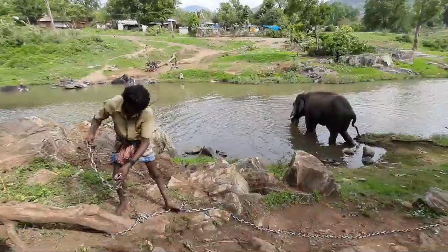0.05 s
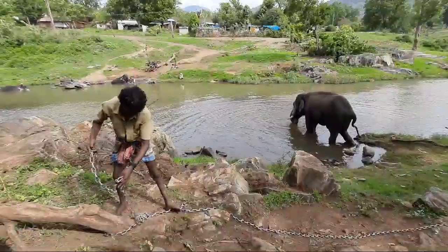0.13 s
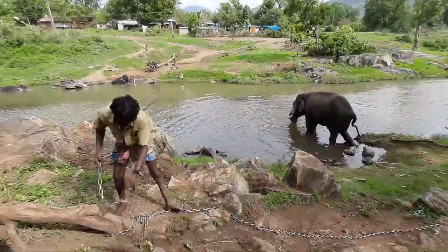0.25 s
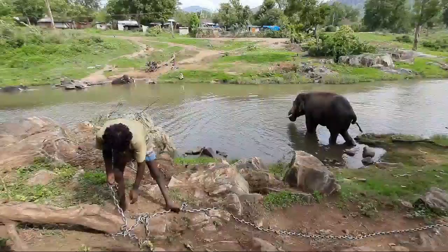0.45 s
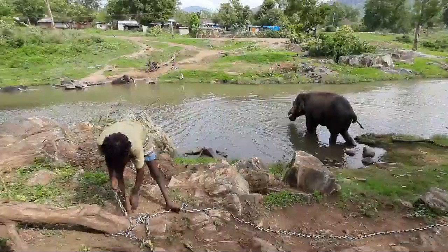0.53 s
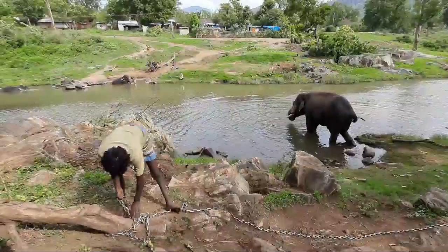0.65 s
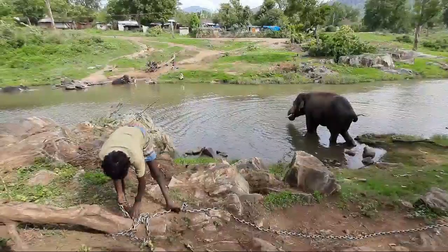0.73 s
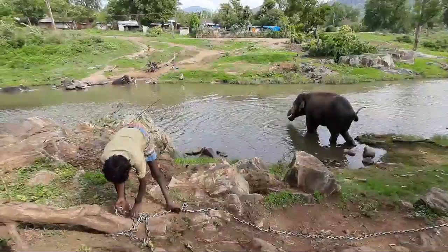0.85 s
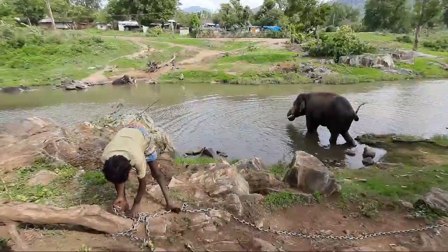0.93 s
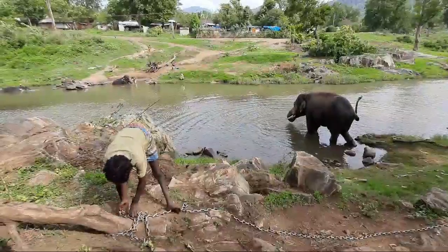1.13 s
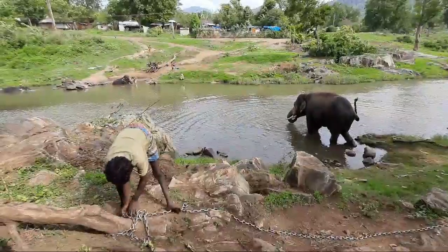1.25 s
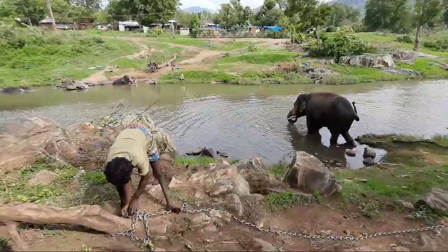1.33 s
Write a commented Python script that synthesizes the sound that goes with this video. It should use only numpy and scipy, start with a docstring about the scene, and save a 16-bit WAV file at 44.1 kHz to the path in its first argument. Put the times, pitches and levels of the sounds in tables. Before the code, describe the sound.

A steel chain clinks a few times slightly to the left, while wind puffs on the microphone over a faint outdoor hiss. From about 0.3 to 0.7 seconds the chain pours into a bright, ringing heap, knocking on rock and crunching grit around 0.4 seconds. A link rings faintly near 0.8 to 1 second, then the loose end ticks and rattles softly until 1.4 seconds as the wind fades.

```python
"""Wind puffs on the microphone ports over a faint background hiss, on a rocky river bank.
A little to the left a steel chain is lowered: a few links clink, each ringing at its own pitch,
then the slack pours into a ringing heap, crunching grit and knocking on the stone.
A free-hanging link rings faintly, and the loose end ticks and rattles as it is picked over."""
import sys
import numpy as np
from scipy.fft import rfft, irfft, next_fast_len
from scipy.io import wavfile
from scipy.ndimage import uniform_filter1d, minimum_filter1d, map_coordinates

SR = 44100
rng = np.random.default_rng(int(sys.argv[2]) if len(sys.argv) > 2 else 0)


def dump(signal):
    """Clip the signal to [-1, 1] and save it as 16-bit WAV at the path in sys.argv[1]."""
    limited = np.clip(np.atleast_2d(signal).T, -1, 1)
    pcm = np.round(limited * 32767).astype(np.int16)
    wavfile.write(sys.argv[1], SR, pcm)


N = 61739

# Spectrum of steel landing on gritty rock: frequency_hz, level_db
ROCK_SPECTRUM = [(200, 2.5), (1500, 2), (2100, 3.5), (3500, -7.5), (5400, -0.5), (7000, -19), (15000, -3.5)]
WIND_ALIKE, AIR_ALIKE, ROCK_ALIKE = 0.13, 0.022, -0.037  # left-right correlation
ATTACK_S = 0.001
LEFT_RIGHT = np.array([[.5], [-.5]])  # splits a level or phase gap between the channels


def amp(db):
    """Decibels to gain."""
    return 10 ** (np.asarray(db) / 20)


def unit(x):
    """Scale to rms 1."""
    return x / np.sqrt(np.mean(x ** 2) + 1e-20)


def clock():
    """Time of each sample in seconds."""
    return np.arange(N) / SR


def level(rows, t):
    """Gain along a curve of time_s, level_db."""
    return amp(np.interp(t, *np.transpose(rows)))


def wobble(knots_per_s):
    """A smooth random curve."""
    knots = rng.standard_normal(int(N * knots_per_s / SR) + 4)
    return map_coordinates(knots, [clock() * knots_per_s])


def noise(spectrum, alike, scale=1):
    """Stereo noise of rms 1 with the given spectrum and left-right correlation."""
    size = next_fast_len(N + SR // 4)
    hz, db = np.transpose(spectrum)
    gain = amp(np.interp(np.log(np.fft.rfftfreq(size, 1 / SR) + 1), np.log(hz * scale), db))
    mid, side = irfft(rfft(rng.standard_normal((2, size))) * gain, size)[:, :N]
    angle = np.arccos(np.clip(alike, -1, 1)) / 2
    mid, side = np.cos(angle) * mid, np.sin(angle) * side
    return unit(np.array([mid + side, mid - side]))


def add(out, start_s, x):
    """Mix x into out from start_s."""
    i = max(round(start_s * SR), 0)
    out[:, i:i + x.shape[1]] += x[:, :max(N - i, 0)]


def wind(lumps_db=4.5, lumps_per_s=130):
    """Hollow, lumpy puffs blow right across the microphone ports, over a low rumble."""
    # Puffs at the ports: peak_s, level_db, width_s, centre_hz
    puffs = [(0.02, -27.5, 0.043, 350), (0.055, -25, 0.0092, 93), (0.113, -27.5, 0.005, 410),
             (.195, -34, 0.024, 88), (0.219, -25, 0.0048, 273), (0.254, -20, 0.014, 335),
             (0.339, -28, 0.012, 412), (0.481, -30, .012, 295), (0.587, -34, .012, 253),
             (.77, -32, 0.012, 327), (0.85, -31, 0.021, 331), (0.906, -33, 0.015, 355),
             (0.978, -34.5, 0.0083, 337), (1.071, -40.5, 0.0043, 290), (1.172, -36, 0.013, 237)]
    # Spectrum of a puff: ratio_to_centre, level_db
    puff_spectrum = [(.2, -31), (.55, -12.5), (1, 0.5), (1.6, -7.5), (2.4, -24.5), (20, -100)]
    # Rise and fall of the rumble: time_s, level_db
    rumble_level = [(0, -26.5), (.09, -35.5), (.2, -36), (.41, -37.5), (.455, -72), (.59, -39.5),
                    (.71, -51.5), (.78, -43.5), (1.19, -52.5), (1.4, -60.5)]
    # Spectrum of the rumble: frequency_hz, level_db
    rumble_spectrum = [(20, -29), (70, -3), (220, -10), (500, -15.5), (1000, -32.5), (8000, -110)]
    t = clock()
    out = level(rumble_level, t) * noise(rumble_spectrum, WIND_ALIKE)
    for peak_s, db, width_s, hz in puffs:
        swell = np.exp(1 - np.sqrt(1 + 2 * ((t - peak_s) / width_s) ** 2))
        eddies = swell * amp(lumps_db * wobble(lumps_per_s)) * noise(puff_spectrum, WIND_ALIKE, hz)
        out += amp(db) * unit(eddies) * np.sqrt(np.mean(swell ** 2))
    return out


def background_hiss():
    """Faint background hiss that swells while the chain pours, then falls back."""
    # Spectrum of the hiss: frequency_hz, level_db
    spectrum = [(300, -2.5), (1300, -12.5), (2000, -9.5), (2600, -16), (7000, -20.5), (11500, -19.5),
                (15000, -36)]
    # Level of the hiss: time_s, level_db
    hiss_level = [(0, -51.5), (.24, -45.5), (.5, -43), (.65, -55.5), (1.4, -56.5)]
    return level(hiss_level, clock()) * noise(spectrum, AIR_ALIKE)


def ring(hz, t60, phase_spread_rad=0.77):
    """One dying mode of a steel link or a stone, which reaches the two ports out of phase."""
    # Phase lead of the left port: frequency_hz, lead_rad
    port_phase = [(10200, 1.33), (12000, 2.04)]
    t = clock()[:int(min(t60, 1) * SR)]
    lead = np.interp(hz, *np.transpose(port_phase)) + phase_spread_rad * rng.standard_normal()
    envelope = amp(-60 * t / t60) * (1 - np.exp(-t / ATTACK_S))
    return envelope * np.sin(2 * np.pi * (hz * t + rng.random()) + lead * LEFT_RIGHT)


def ticks(hits, hz, t60=0.025):
    """The short crack of steel on steel at each hit (start_s, level_db), brightest near hz."""
    # Spectrum of a contact: ratio_to_link_pitch, level_db
    spectrum = [(.1, -31), (.68, -21), (1.02, 0), (1.17, -12), (1.4, -38)]
    power, t = np.zeros((1, N)), clock()[:SR // 10]
    for start_s, db in hits:
        envelope = amp(db - 60 * t / t60) * (1 - np.exp(-t / ATTACK_S))
        add(power, start_s, envelope[None] ** 2)
    return np.sqrt(power) * noise(spectrum, AIR_ALIKE, hz)


def clinks(contacts=3, neighbours=4):
    """Two links ring at their own pitches, stir neighbours of like pitch and rebound ever more softly."""
    # Two links meet: start_s, level_db, first_link_hz, second_link_hz, t60_s, tick_offset_db
    meetings = [(0.0757, -20.5, 12010, 9680, 0.054, -8), (0.1329, -41.5, 10200, 11050, 0.11, 10.5),
                (0.1872, -31.5, 10730, 10200, 0.2, -4), (.2115, -12.5, 11120, 10122, 0.079, -12.5),
                (0.223, -12, 10780, 12100, 0.044, -10.5), (0.2315, -16.5, 11137, 10760, 0.019, -5),
                (0.2737, -32, 10160, 10730, 0.071, 2), (0.305, -32, 10900, 10250, .05, 6.5),
                (0.3181, -13.5, 10840, 11900, 0.15, -4), (0.3419, -2, 10020, 10470, 0.082, -15),
                (0.381, -8.5, 9900, 11840, 0.27, -29), (0.4204, -8, 9880, 10920, 0.077, -11),
                (0.486, -14.5, 11030, 9620, 0.34, -4.5), (0.5559, -18, 9938, 12050, 0.1, -30),
                (0.668, -30.5, 10338, 10010, 0.26, -7), (0.8184, -41.5, 10100, 9500, 0.18, -9),
                (.903, -44, 10650, 11130, 0.26, 4), (0.998, -33, 9502, 10070, 0.21, 2.5),
                (1.1175, -36.5, 10950, 10100, 0.018, -7.5), (1.1717, -42.5, 11250, 12080, 0.17, -4),
                (1.2422, -38, 11450, 11850, 0.061, 5), (1.3, -29.5, 8910, 12140, 0.11, 1)]
    rebound_s, rebound_db, rebound_detune_hz = 0.0076, -8, 61.7
    second_link_db, neighbour_db, neighbour_spread_hz = -6, -15.5, 630
    out = np.zeros((2, N))
    for start_s, db, first_hz, second_hz, t60, tick_db in meetings:
        hits = []
        for bounce in range(contacts):
            hit_s = start_s + rebound_s * bounce * (1 + (rng.random() - .5) / contacts)
            hit_db = db + rebound_db * bounce
            hits.append((hit_s, hit_db + tick_db))
            for hz, link_db in [(first_hz, 0), (second_hz, second_link_db)]:
                detune_hz = bounce * rebound_detune_hz * rng.standard_normal()
                add(out, hit_s, amp(hit_db + link_db) * ring(hz + detune_hz, t60))
            # no two neighbouring links are quite the same size
            between_hz = first_hz + (second_hz - first_hz) * rng.random(neighbours)
            for hz in between_hz + neighbour_spread_hz * rng.standard_normal(neighbours):
                add(out, hit_s, amp(hit_db + neighbour_db) * ring(hz, t60))
        out += ticks(hits, max(first_hz, second_hz))
    return out


def jingle(strength, modes, detune_hz, tick_db, collisions_per_s=260, scatter_db=3):
    """Jostling links collide densely; each collision ticks and rings about half of their modes."""
    out = np.zeros((2, N))
    times = np.arange(strength[0][0], strength[-1][0], 1 / collisions_per_s)
    times += rng.random(len(times)) / collisions_per_s
    levels_db = np.interp(times, *np.transpose(strength)) + scatter_db * rng.standard_normal(len(times))
    for start_s, db in zip(times, levels_db):
        for k in rng.choice(len(modes), size=len(modes) // 2, replace=False):
            hz, mode_db, t60 = modes[k]
            add(out, start_s, amp(db + mode_db) * ring(hz + detune_hz * rng.standard_normal(), t60))
    return out + ticks(zip(times, levels_db + tick_db), modes[-1][0])


def pouring_heap():
    """The slack pours link upon link into a ringing heap."""
    # Strength of the collisions: time_s, level_db
    strength = [(.32, -29), (.345, -25.5), (.44, -28), (.49, -27.5), (.58, -32), (.675, -38.5)]
    # Modes of the heaped links: pitch_hz, level_db, t60_s
    modes = [(9620, -1.5, 0.079), (9890, 0.5, 0.21), (10020, 4, 0.15), (10420, -6, 0.31), (10770, 1, 0.13),
             (11030, 1.5, 0.24), (11150, 3, 0.14), (11900, 4.5, 0.1), (12200, -1, 0.14)]
    return jingle(strength, modes, detune_hz=32.7, tick_db=-11)


def crunch(grit_db=1, grit_per_s=600):
    """Grit grinds under the landing links: a quick swell and a dry decay."""
    # Links land on gritty rock: peak_s, level_db, rise_s, t60_s
    landings = [(0.393, -21.5, 0.013, 0.1), (0.427, -30.5, 0.01, 0.048), (0.487, -33.5, 0.0088, 0.12)]
    envelope = np.zeros(N)
    for peak_s, db, rise_s, t60 in landings:
        t = clock() - peak_s
        envelope += amp(db - 60 * np.maximum(t, 0) / t60) * np.exp(np.minimum(t, 0) / rise_s)
    return envelope * unit(amp(grit_db * wobble(grit_per_s)) * noise(ROCK_SPECTRUM, ROCK_ALIKE))


def knocks(crack_t60=0.026, clank_t60=0.036, detune_hz=49):
    """A link hits bare rock: a sharp crack and a short, choked ring of the stone."""
    # Single links strike the rock: start_s, level_db
    strikes = [(0.3875, -19), (0.3968, -18), (0.4764, -29.5), (0.4883, -23)]
    # Modes of the struck stone: pitch_hz, level_db
    clank_modes = [(2780, -7.5), (5350, -8.5)]
    out, t = np.zeros((2, N)), clock()
    for start_s, db in strikes:
        add(out, start_s, amp(db - 60 * t / crack_t60) * noise(ROCK_SPECTRUM, ROCK_ALIKE))
        for hz, mode_db in clank_modes:
            add(out, start_s, amp(db + mode_db) * ring(hz + detune_hz * rng.standard_normal(), clank_t60))
    return out


def hanging_link(waver_db=6, waver_per_s=45):
    """The low bending tones of a free link waver in level as it turns."""
    # The free link is set ringing: start_s, level_db
    strikes = [(0.82, -51), (0.902, -55), (0.996, -52.5), (1.044, -57.5)]
    # Its bending modes: pitch_hz, level_db, t60_s
    bending_modes = [(5886, 1.5, 0.31), (6670, -2.5, 0.27), (7600, 2, 0.14)]
    out = np.zeros((2, N))
    for hz, mode_db, t60 in bending_modes:
        tone = np.zeros((2, N))
        for start_s, db in strikes:
            add(tone, start_s, amp(db + mode_db) * ring(hz, t60))
        out += tone * amp(waver_db * wobble(waver_per_s))
    return out


def loose_end():
    """The last links rattle softly together as the chain is picked over."""
    # Strength of the collisions: time_s, level_db
    strength = [(1.15, -60), (1.175, -47), (1.21, -70), (1.25, -46), (1.29, -69), (1.305, -40.5),
                (1.34, -39.5), (1.36, -54), (1.4, -47)]
    # Modes of the loose links: pitch_hz, level_db, t60_s
    modes = [(6460, -7.5, .05), (8730, 6, 0.045), (9370, 1.5, 0.068), (10990, -1.5, 0.059),
             (12000, 1, 0.054)]
    return jingle(strength, modes, detune_hz=170, tick_db=-3.5)


def scene():
    """The chain lies a little left of the microphone in the open air, with wind and a faint hiss."""
    pan_db = 3.5
    links = (pouring_heap() + loose_end() + clinks() + hanging_link()) * amp(pan_db * LEFT_RIGHT)
    return links + crunch() + knocks() + wind() + background_hiss()


def record(dry):
    """The recorder limits the loudest peaks and keeps nothing above its band limit."""
    ceiling, hold_s, top_hz = .85, .002, 15700
    hold = int(hold_s * SR)
    needed_gain = ceiling / np.maximum(np.abs(dry).max(axis=0), ceiling)
    limited = dry * uniform_filter1d(minimum_filter1d(needed_gain, 2 * hold), hold)
    size = next_fast_len(N + SR // 4)
    lowpass = 1 / (1 + (np.fft.rfftfreq(size, 1 / SR) / top_hz) ** 120)
    return irfft(rfft(limited, size) * lowpass, size)[:, :N]


dry = scene()
out = record(dry)
dump(out)
```